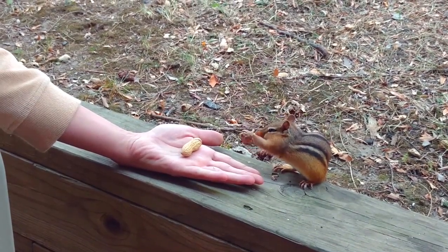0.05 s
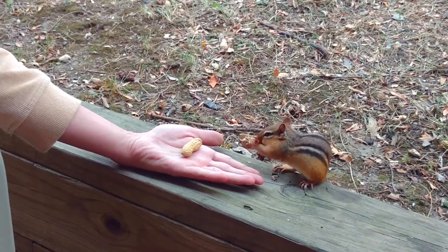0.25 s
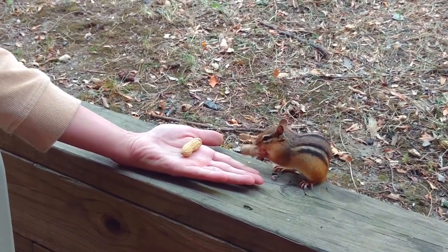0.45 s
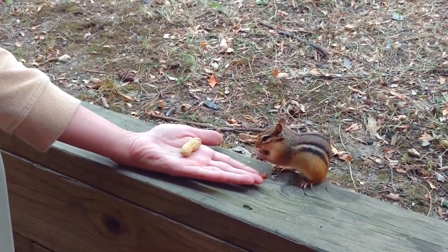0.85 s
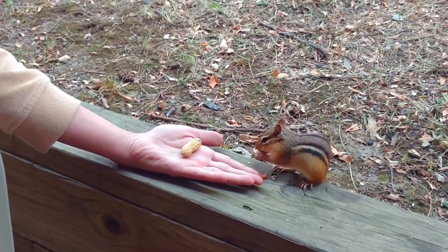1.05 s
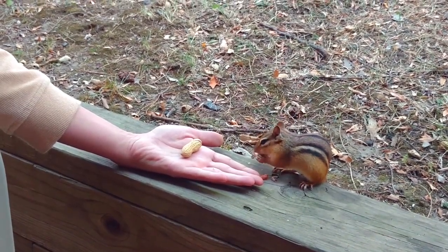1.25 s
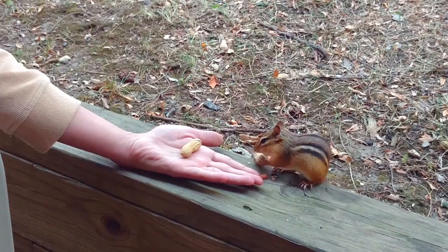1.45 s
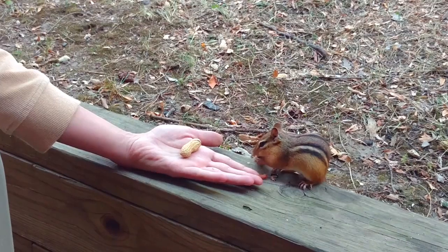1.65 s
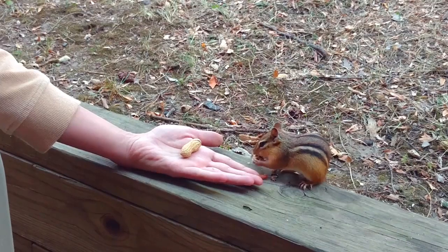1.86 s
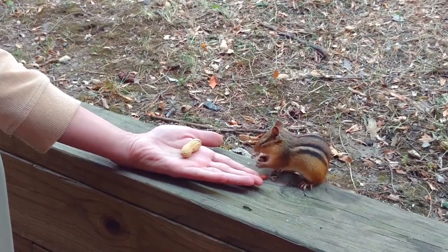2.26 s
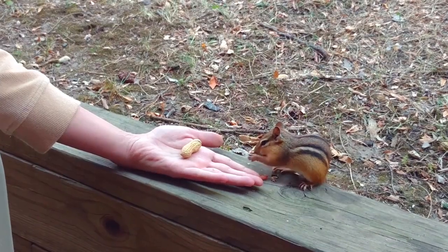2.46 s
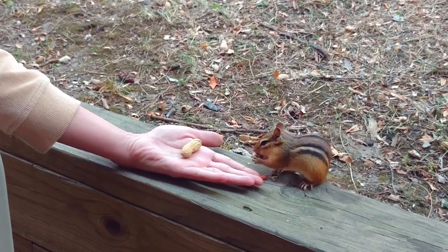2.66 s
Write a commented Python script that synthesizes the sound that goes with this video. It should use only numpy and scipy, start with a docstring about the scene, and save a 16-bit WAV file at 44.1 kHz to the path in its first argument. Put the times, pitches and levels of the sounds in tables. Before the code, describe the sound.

A chipmunk chirps sharply twice over distant traffic and insects in the woods.

```python
"""A wood, with a bed of far traffic, leaf hiss, machine hum and throbbing insects throughout.
Faint, distant peeps and a tick of nibbling come first. A small animal's sharp, falling chirp rings
through the trees at 0.5 s; another peep and a dry, woody tap follow, then a second chirp at 1.9 s.
At 2.4 s a hard part snaps and bounces beside the microphone, and the triple click makes the
recorder's gain control duck. The recorder also widens the stereo image of the whole scene."""
import sys
import numpy as np
from scipy import signal
from scipy.fft import rfft, irfft
from scipy.io import wavfile
from scipy.ndimage import minimum_filter1d

SR = 44100
rng = np.random.default_rng(int(sys.argv[2]) if len(sys.argv) > 2 else 0)


def waveform_to_disk(signal):
    """Save audio, clipped to [-1, 1], as 16-bit WAV at the path in sys.argv[1]."""
    frames = np.transpose(np.atleast_2d(signal))
    scaled = np.clip(frames, -1, 1) * 32767
    samples = np.round(scaled).astype(np.int16)
    wavfile.write(sys.argv[1], SR, samples)


N = 119070


def undb(db):
    return 10 ** (np.asarray(db) / 20)


def times():
    return np.arange(N) / SR


def freqs():
    return np.maximum(np.fft.rfftfreq(N, 1 / SR), 1)


def over_hz(points):
    """Joins (Hz, value) points on a log-frequency axis."""
    hz, value = np.array(points, float).T
    return np.interp(np.log(freqs()), np.log(hz), value)


def pan(db):
    """Left and right gains for a level difference; positive leans left."""
    return undb(np.array([[.5], [-.5]]) * db)


def cut(x, kind, hz):
    """A 24 dB per octave low-pass or high-pass."""
    return signal.sosfilt(signal.butter(4, hz, kind, fs=SR, output="sos"), x)


def wander(rate_hz):
    """Smooth random modulation with a spread of 1."""
    y = irfft(rfft(rng.standard_normal(N)) * np.exp(-(freqs() / rate_hz) ** 2) * (freqs() > 1), N)
    return y / y.std()


def noise_band(hz, width):
    """One resonance of unit level, driven by unrelated noise left and right."""
    y = irfft(rfft(rng.standard_normal((2, N))) / (1 + (2 * (freqs() - hz) / width) ** 4), N)
    return y / y.std()


def reverb(x, t60, predelay):
    """A dying cloud of reflections of unit energy, different at each ear."""
    t = times()
    tail = rng.standard_normal((2, N)) * undb(-60 * t / t60) * (t > predelay)
    tail /= np.sqrt(np.sum(tail ** 2, axis=1, keepdims=True))
    return signal.fftconvolve(x[None], tail, axes=1)[:, :N]


# tone of the rumble and hiss (frequency [Hz], density [dB per Hz])
BED_SPECTRUM = [(20, -90), (45, -87), (70, -71), (100, -64), (150, -62.5), (200, -62), (260, -63),
                (420, -68.5), (650, -69.5), (930, -65.5), (1450, -77), (2300, -79.5), (3500, -76),
                (4300, -80.5), (6000, -82.5), (8000, -90.5), (11000, -99), (14300, -104), (15200, -120)]
# how centred the bed sounds (frequency [Hz], left-right correlation [0 to 1])
BED_CORRELATION = [(60, 0.75), (300, 0.25), (650, 0.91), (1400, 0.31), (2500, 0), (8000, 0.069)]
# balance of the bed (frequency [Hz], left minus right [dB])
BED_PAN = [(60, -5.5), (200, -6.5), (380, 1), (700, -4), (1300, -1.5), (8000, -4.5)]


def traffic_and_leaves():
    """Far traffic rumbles, leaning right, under a smooth, wide hiss of leaves."""
    correlation = over_hz(BED_CORRELATION)
    mid, side = rfft(rng.standard_normal((2, N)))
    ears = mid * np.sqrt(1 + correlation) + np.array([[1], [-1]]) * side * np.sqrt(1 - correlation)
    bed = irfft(ears * pan(over_hz(BED_PAN)) * undb(over_hz(BED_SPECTRUM)), N) * np.sqrt(SR) / 2
    return bed * undb(0.7 * wander(7.8))


# machine tones (pitch [Hz], level [dB], width [Hz], phase drift at each ear [rad])
HUM_TONES = [(72.8, -54.5, 3.5, .3), (146.5, -45.5, 5.6, 0.59), (235.1, -43, 5.8, .6),
             (347.8, -53, 3.1, 0.28), (880, -58, 12.3, 0.38), (992.3, -47.5, 2, 0.23),
             (2154, -56, 8.7, 0.53)]
HUM_PAN_DB, HUM_WAVER_DB = -3, 2


def machine_hum():
    """A distant machine's tones waver in pitch, level and stereo position."""
    out = 0
    for hz, db, width, drift_rad in HUM_TONES:
        phase = 2 * np.pi * np.cumsum(hz + width / 2 * wander(10.6)) / SR
        drift = drift_rad * np.array([wander(16.3), wander(5.8)])
        out = out + np.sqrt(2) * undb(db + HUM_WAVER_DB * wander(14.0)) * np.sin(phase + drift)
    return out * pan(HUM_PAN_DB)


# insect voices (centre [Hz], width [Hz], level [dB], throb depth [dB], throb rate [Hz])
INSECT_BANDS = [(3684, 38, -57, 2.5, 13), (5030, 1000, -50.5, 3.5, 10), (6070, 850, -58.5, 4, 36)]
# fader ride on the whole chorus (time [s], level [dB])
CHORUS_SWELL = [(0, -3), (.8, 3), (1.25, 5), (1.5, -3), (1.8, 0), (2.2, 3), (2.6, -4)]


def insects():
    """Narrow, unevenly throbbing bands of a far chorus that slowly swells and ebbs."""
    swell = undb(np.interp(times(), *np.array(CHORUS_SWELL).T))
    return swell * sum(noise_band(hz, width) * undb(db + throb_db * wander(rate))
                       for hz, width, db, throb_db, rate in INSECT_BANDS)


CLEAN_ABOVE_HZ, BREAK_RANGE_HZ, RASP_DB, CALL_FADE_S = 4110, 690, 1.07, 0.0015


def whistle(points, jitter, break_jitter=0):
    """An animal's tone along (s, Hz, dB) points; break_jitter roughens it as the pitch falls."""
    t = times()
    at, hz, db = np.array(points, float).T
    pitch = np.interp(t, at, hz)
    roughness = jitter + break_jitter * np.clip((CLEAN_ABOVE_HZ - pitch) / BREAK_RANGE_HZ, 0, 1)
    phase = 2 * np.pi * np.cumsum(pitch * (1 + roughness * wander(460))) / SR
    gate = np.clip(np.minimum(t - at[0], at[-1] - t) / CALL_FADE_S, 0, 1)
    level = undb(np.interp(t, at, db) + RASP_DB * wander(220))
    return np.sqrt(2) * gate * level * np.sin(phase)


# far calls (start [s], length [s], first pitch [Hz], last pitch [Hz], level [dB])
PEEP_NOTES = [(.043, 0.031, 3350, 3424, -43), (0.087, 0.038, 3420, 3444, -45),
              (.29, 0.03, 4550, 4870, -44.5), (.336, .052, 3404, 4330, -43),
              (0.381, 0.0245, 3726, 3010, -42), (1.455, 0.034, 4150, 3970, -46.5),
              (2.065, 0.011, 3450, 4020, -40)]
PEEP_ARCH, PEEP_FADE_DB, PEEP_WET_DB = 0.029, 9, -1
WOOD_T60_S, PREDELAY_S = 0.54, .007


def peeps():
    """Faint gliding notes, slightly arched in pitch and level, half lost in the wood's echo."""
    along = np.linspace(0, 1, 9)
    edge = (2 * along - 1) ** 2  # 0 mid-note, 1 at both ends
    voice = 0
    for at, length, from_hz, to_hz, db in PEEP_NOTES:
        glide = from_hz + (to_hz - from_hz) * along
        pitch = glide * (1 + PEEP_ARCH * (1 - edge))
        contour = np.c_[at + length * along, pitch, db - PEEP_FADE_DB * edge]
        voice = voice + whistle(contour, jitter=0.0126)
    return voice + undb(PEEP_WET_DB) * reverb(voice, WOOD_T60_S, PREDELAY_S)


# nibbling and handling (time [s], centre [Hz], width [Hz], level [dB], attack [s], t60 [s])
TICK_BURSTS = [(.352, 11000, 7500, -46.5, .018, .09), (2.390, 640, 790, -29.5, .001, 0.024),
               (2.392, 10000, 7000, -32, .001, .013)]


def ticks():
    """Small rubs and contacts: bursts of noise that swell, then die quickly."""
    t = times()
    out = 0
    for at, hz, width, db, attack, t60 in TICK_BURSTS:
        swell = np.exp(-(np.minimum(t - at, 0) / attack) ** 2)
        decay = undb(db - 60 * np.maximum(t - at, 0) / t60)
        out = out + noise_band(hz, width) * swell * decay
    return out


# the two loud chirps, one contour each (time [s], pitch [Hz], level [dB])
CHIRP_CONTOURS = [
    [(.487, 4110, -33), (.492, 4404, -27), (.500, 4445, -26), (.505, 4334, -19.5), (.514, 4120, -22),
     (.520, 4080, -25), (.526, 3310, -36), (.533, 3380, -21.5), (.541, 3582, -19.5), (.549, 3420, -30),
     (.559, 3294, -30), (.570, 2780, -27)],
    [(1.935, 3702, -27), (1.940, 4402, -25), (1.946, 4442, -18.5), (1.955, 4220, -17.5), (1.964, 3943, -23),
     (1.972, 3566, -25.5), (1.980, 3440, -24), (1.990, 3473, -29), (1.998, 3592, -17.5),
     (2.008, 3347, -25.5), (2.016, 2900, -31)],
]
LISP_LEAD_S, LISP_LENGTH_S, LISP_DB, SIZZLE_DB = 0.0026, 0.0085, -32.5, -50
CHIRP_PAN_DB, RIGHT_LAG_S = 9, 0.0002
DIRECT_DB, NEAR_DB, WOOD_DB = -5, -5, -8


def chirps():
    """Calls from the left open with an airy lisp, then echo off near surfaces and, duller, off trees."""
    voice = sum(whistle(contour, jitter=0.0046, break_jitter=.036) for contour in CHIRP_CONTOURS)
    lisp_times = [contour[0][0] - LISP_LEAD_S for contour in CHIRP_CONTOURS]
    lisp_envelope = sum(np.exp(-((times() - at) / LISP_LENGTH_S) ** 2) for at in lisp_times)
    lisp = undb(LISP_DB) * noise_band(hz=5350, width=600)
    sizzle = undb(SIZZLE_DB) * noise_band(hz=11600, width=700)
    voice = voice + lisp_envelope * (lisp + sizzle)[0]
    right = irfft(rfft(voice) * np.exp(-2j * np.pi * freqs() * RIGHT_LAG_S), N)
    direct = undb(DIRECT_DB) * pan(CHIRP_PAN_DB) * np.array([voice, right])
    near = undb(NEAR_DB) * reverb(voice, t60=0.15, predelay=PREDELAY_S)
    trees = undb(WOOD_DB) * reverb(cut(voice, "lowpass", hz=4500), WOOD_T60_S, 2 * PREDELAY_S)
    return direct + near + trees


def ring(at, modes):
    """Damped (Hz, dB, t60) modes struck at one moment."""
    age = np.maximum(times() - at, 0)
    return sum(undb(db - 60 * age / t60) * np.sin(2 * np.pi * hz * age) for hz, db, t60 in modes)


# woody body of the tap (frequency [Hz], level [dB], t60 [s])
TAP_MODES = [(1180, -2.5, .014), (1520, -8, 0.015), (1830, -2.5, 0.017), (2860, -4, 0.017),
             (3550, -4, .014)]
TAP_AT_S, TAP_DB, TAP_CONTACT_S = 1.6219, -24, .0015


def woody_tap():
    """One small, dry tap; the soft contact rounds off its attack."""
    attack = np.clip((times() - TAP_AT_S) / TAP_CONTACT_S, 0, 1)
    return undb(TAP_DB) * attack * ring(TAP_AT_S, TAP_MODES)


# the snap and its two bounces (time [s], level [dB], treble tilt [dB per octave])
CLICK_HITS = [(2.395, 0, 2.5), (2.4048, 2.5, -4.5), (2.4126, -6.5, -14)]
# ring of the hard part (frequency [Hz], level [dB], t60 [s])
HARD_PART_MODES = [(3600, -4, 0.0031), (4400, -2, 0.0015), (6160, -8, 0.0021), (7260, -10.5, 0.0018),
                   (11700, -7.5, 0.0012), (14400, -7, 0.0014)]
CLICK_TAIL_DB = -6.5


def clicks():
    """A small hard part snaps and bounces right beside the microphone; it radiates no bass."""
    lowest_hz = HARD_PART_MODES[0][0]
    hits = 0
    for at, db, tilt_db in CLICK_HITS:
        modes = [(hz, db + mode_db + tilt_db * np.log2(hz / lowest_hz), t60)
                 for hz, mode_db, t60 in HARD_PART_MODES]
        hits = hits + ring(at, modes)
    direct = cut(hits, "highpass", hz=2530)
    tail = reverb(cut(direct, "lowpass", hz=8100), t60=0.085, predelay=0)
    return direct + undb(CLICK_TAIL_DB) * tail


def scene():
    bed = traffic_and_leaves() + machine_hum() + insects()
    return bed + peeps() + ticks() + chirps() + woody_tap() + clicks()


WIDEN_DELAY_S, WIDEN_SHARE, WIDEN_FROM_HZ = 0.0003913, 0.77, 1265


def widen(x):
    """Each channel subtracts a delayed copy of the other's treble."""
    f, spectrum = freqs(), rfft(x)
    treble = 1 / (1 + (WIDEN_FROM_HZ / f) ** 6)
    delay = np.exp(-2j * np.pi * f * WIDEN_DELAY_S)
    return irfft(spectrum - WIDEN_SHARE * treble * delay * spectrum[::-1], N)


CEILING_DB, RELEASE_DB_PER_S, START_DUCK_DB = -9.5, 8, 4


def gain_control(x):
    """Ducks at once for a peak over the ceiling and releases slowly; it starts slightly ducked."""
    peak = -minimum_filter1d(-np.abs(x).max(axis=0), size=16)
    excess_db = np.maximum(20 * np.log10(peak + 1e-9) - CEILING_DB, 0)
    excess_db[0] = START_DUCK_DB
    release_db = RELEASE_DB_PER_S * times()
    return x * undb(release_db - np.maximum.accumulate(excess_db + release_db))


def record(dry):
    """The recorder's chain: stereo widening, gain control and a steep top cut at 15.7 kHz."""
    top_cut = signal.ellip(8, .2, 70, 15700, fs=SR, output="sos")
    return signal.sosfilt(top_cut, gain_control(widen(dry)))


dry = scene()
out = record(dry)
waveform_to_disk(out)
```